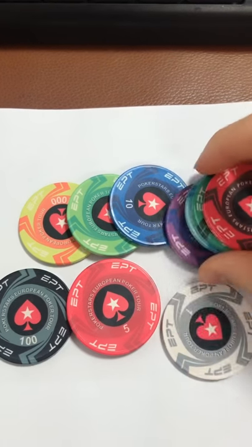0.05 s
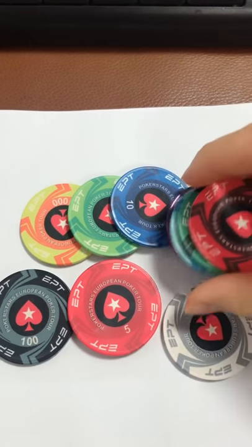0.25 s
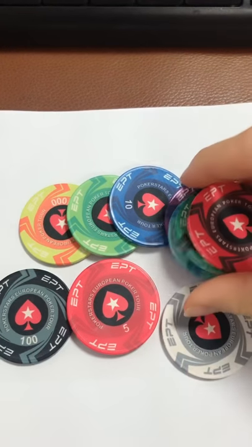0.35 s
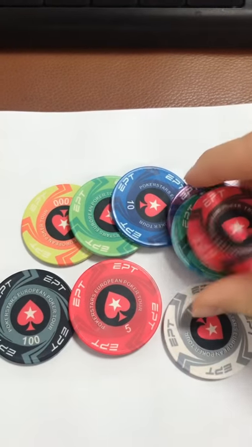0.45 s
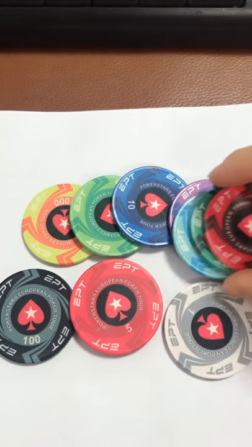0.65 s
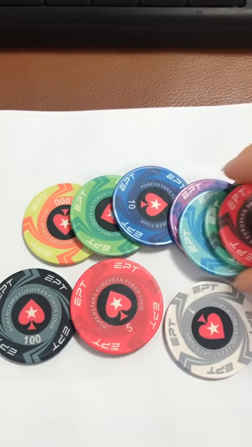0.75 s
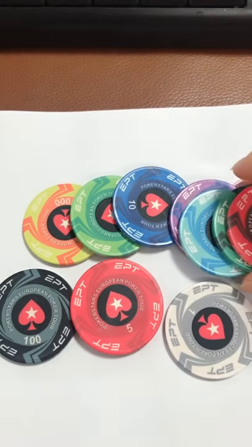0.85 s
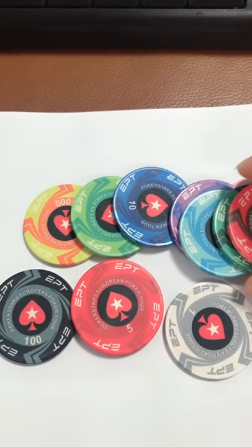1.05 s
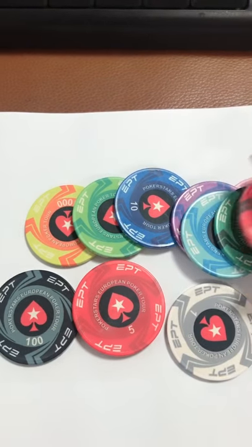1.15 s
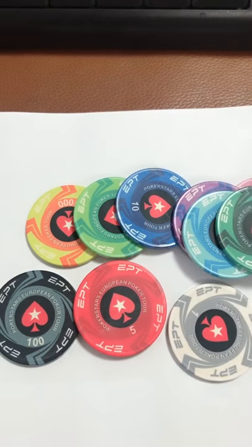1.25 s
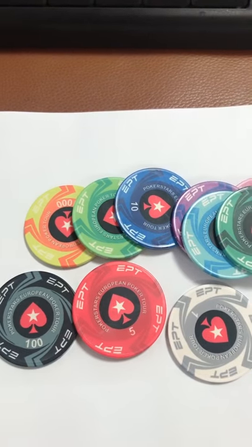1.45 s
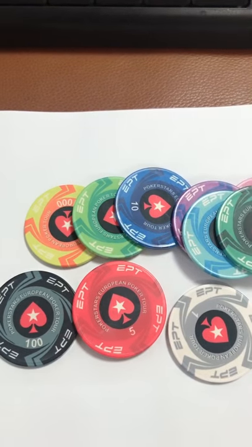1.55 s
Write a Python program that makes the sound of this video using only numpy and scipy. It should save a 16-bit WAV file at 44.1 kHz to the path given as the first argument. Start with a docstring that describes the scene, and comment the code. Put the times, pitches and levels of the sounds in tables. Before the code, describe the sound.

Plastic poker chips fall against each other close by, in a quick run of sharp, briefly ringing clacks from about 0.2 to 0.4 seconds, with soft table thuds underneath. A lighter click comes near 1 second, followed by faint hissing slides. At about 1.5 seconds a last chip tips onto paper with a double tap and thud. The small room rings briefly, over a faint hum and soft rumbles.

```python
"""In a small room, a hand lets plastic poker chips drop from a stack onto a paper-covered table close by.
They hit each other in a quick run of clacks, each a sharp crack and a short ring, then settle and slide
with a grainy hiss. Heavier blows make the table thud, and a last chip tips over and taps on the paper.
The room rings briefly after each clack and tap, over a low hum and soft rumbles."""
import sys
import numpy as np
from scipy import signal
from scipy.fft import rfft, irfft, next_fast_len
from scipy.io import wavfile
from scipy.ndimage import uniform_filter1d

SR = 44100
rng = np.random.default_rng(int(sys.argv[2]) if len(sys.argv) > 2 else 0)


def materialize(psi):
    """Save the field psi as 16-bit PCM at rate SR to the path in sys.argv[1].

    A 1-D psi becomes a single channel; in a 2-D psi each row is a channel.
    """
    bounded = np.clip(np.atleast_2d(psi).T, -1, 1)
    quanta = np.round(bounded * 32767).astype(np.int16)
    wavfile.write(sys.argv[1], SR, quanta)


N = 70560  # 1.6 s


def amp(db):
    """Turn decibels into a number to multiply by."""
    return 10 ** (np.asarray(db) / 20)


def unit(x):
    """Scale a sound so that its average power is 1."""
    return x / np.sqrt(np.mean(x ** 2) + 1e-20)


def fade(t, fade_s):
    """Die away from time zero; a fade time is how long it takes to drop 60 dB."""
    return amp(-60 * np.maximum(t, 0) / fade_s)


def along(points, hz):
    """Read between (frequency, value) points, spaced as the ear hears pitch."""
    f, values = np.transpose(points)
    return np.interp(np.log(hz + 1), np.log(f + 1), values)


def coloured(x, points):
    """Give a sound a tone colour: turn each frequency up or down as the points say."""
    m = next_fast_len(2 * len(x))
    gain = amp(along(points, np.fft.rfftfreq(m, 1 / SR)))
    cepstrum = irfft(np.log(gain), m)
    cepstrum[1:m // 2] *= 2  # fold the filter forward in time, so nothing sounds before the hit
    cepstrum[m // 2 + 1:] = 0
    return irfft(rfft(x, m) * np.exp(rfft(cepstrum)), m)[:len(x)]


def noise(points, size=N):
    """Steady noise with the given tone colour."""
    gain = amp(along(points, np.fft.rfftfreq(size, 1 / SR)))
    return unit(irfft(rfft(rng.standard_normal(size)) * gain, size))


def burst(shape):
    """A short puff of noise, evened out from bass to treble."""
    puff = shape * rng.standard_normal(len(shape))
    power = uniform_filter1d(np.abs(rfft(puff)) ** 2, size=20)
    hz = np.fft.rfftfreq(len(puff), 1 / SR)
    return coloured(puff, np.column_stack([hz, -10 * np.log10(power + 1e-12)]))


def add(out, start, x):
    """Mix x into out, beginning at start seconds."""
    i = max(round(start * SR), 0)
    out[i:i + len(x)] += x[:max(len(out) - i, 0)]


# Tone colour of the room's air: f/Hz, level/dB
AIR_COLOUR = [(15, -25), (28, -2), (42, 1), (62, -3.5), (80, -6.5), (120, -9.5), (160, -14.5), (260, -14.5),
              (400, -19), (650, -25.5), (1100, -26), (2000, -29), (3000, -35), (4200, -41.5), (6200, -42.5),
              (7800, -49), (11000, -51), (15500, -51.5)]
# The tones of the hum: f/Hz, level/dB
HUM_TONES = [(119, -61), (381, -63)]
def air_and_hum():
    """A soft rush of room air and a faint hum go on throughout."""
    t = np.arange(N) / SR
    air = amp(-50) * noise(AIR_COLOUR)
    hum = sum(amp(db) * np.sqrt(2) * np.sin(2 * np.pi * (hz * t + rng.random())) for hz, db in HUM_TONES)
    return air + hum


# Tone colour of rubbing plastic: f/Hz, level/dB
RUB_COLOUR = [(400, -35), (1200, 6), (2500, 8.5), (4000, -1.5), (6500, -4), (8000, -7), (9700, -5),
              (11000, -12), (12500, -5), (15500, -18.5)]
# Each slide: t/s, level/dB, rise/s, fade/s, squeak f/Hz, squeak level against the hiss/dB
CHIP_SLIDES = [(0, -57.5, 0.0025, 0.3, 6050, -3.5), (.565, -60.5, 0.007368, 0.25, 14860, -3),
               (1.041, -59.5, 0.0035, .2, 13600, -1.5), (1.136, -59, 0.0067, .2, 15250, -3),
               (1.172, -60.5, 0.00765, 0.1953, 2503, -3.5), (1.314, -63.5, .005, .25, 14000, -5),
               (1.424, -53, 0.013, 0.32, 15230, -11)]
def chip_slides():
    """Chips rub face to face: a grainy hiss and a thin squeak start quickly and run out."""
    out, t = np.zeros(N), np.arange(SR // 2) / SR
    n, hz = len(t), np.fft.rfftfreq(len(t), 1 / SR)
    squeak_width_hz, grain_db = 570, 2
    for start, db, rise, fade_s, squeak_hz, squeak_db in CHIP_SLIDES:
        band = 1 / (1 + ((hz - squeak_hz) / squeak_width_hz) ** 2)
        squeak = unit(irfft(rfft(rng.standard_normal(n)) * band, n))
        flicker = unit(uniform_filter1d(rng.standard_normal(n), size=60))
        grain = unit(amp(grain_db * flicker))
        rub = noise(RUB_COLOUR, size=n) + amp(squeak_db) * squeak
        shape = np.minimum(t / rise, 1) * fade(t - rise, fade_s)
        add(out, start, amp(db) * shape * grain * rub)
    return out


# The tones a chip rings with: f/Hz, level/dB, fade/s
CHIP_TONES = [(1220, -19.5, .014), (1787, -12, .014), (2900, -11.5, .012), (3718, -9.5, .018),
              (4407, -11, .014), (5934, -3, .018), (6560, -2, 0.022), (9100, -15, 0.011), (9900, -19, .012),
              (12030, -2, 0.0055), (14170, -12.5, 0.027), (15200, -7, 0.0083)]
def chip_ring(t, stretch):
    """A struck chip shakes at several pitches at once, a little differently on every hit."""
    hz, db, fade_s = np.transpose(CHIP_TONES)[:, :, None]
    detune, vary = rng.standard_normal((2, len(CHIP_TONES), 1))
    signs = (-1) ** np.arange(len(CHIP_TONES))[:, None]  # every other tone starts downward
    waves = signs * np.sin(2 * np.pi * hz * (1 + .014 * detune) * t)
    tones = amp(db + .34 * vary) * fade(t, fade_s * stretch) * waves
    return .5 * tones.sum(0) * (1 - np.exp(-t / .0002))


# Tone colour of rattling rims: f/Hz, level/dB
RIM_COLOUR = [(300, -16), (900, -16), (1700, -4), (2500, -7.5), (3600, -6), (5100, -7.5), (6400, 2.5),
              (7300, -12), (8000, -16.5), (9200, -5.5), (10600, -12), (12200, -3), (13600, -10),
              (15000, -5)]
# Each hit: t/s, level/dB, then how much is added to four bands from low to high
# (clunk/dB, hollow body/dB, lower ring/dB, snap/dB), and a stretch factor for the fade times
CHIP_HITS = [(.2338, -0.5, -13, -3.5, -8, -6.5, 0.94), (0.2373, -14, -13, 0, -1, -6, 1.6),
             (.2420, -14, -0.5, 3.5, -3, 1, 1.24), (0.2461, -20.5, -1, 3.5, 9, 6, 1.5),
             (.2538, -18, -1.5, -4, -3, -13, .8), (.2553, -5, -9, 0, 0, 0.995, .6),
             (.2567, -4, -6.5, -6, 2, 6, 0.29), (0.258, -3.5, -10.5, -27, -6, -13, 0.99),
             (0.2606, -18.5, -4, -1, 2, -7.5, 0.79), (0.275, -8.5, -7.5, -4, -2, 7, .6),
             (0.2783, -10, -8, -1.5, -1.5, -12.5, 1.2), (0.2822, -12, 0, -1.5, -2.5, -7.5, 1.1),
             (0.2924, -22.5, -1, 1.5, 0.5, -3.5, 1.3), (0.31, -29, 7.5, -3.5, 0, 0.5, 1.4),
             (.3220, -30, -8, -22, 6.5, -19, 1), (0.3348, -21.5, 5.5, 5.5, 13, 15, 0.35),
             (.3645, -35, 6, 10, -3, -8.5, 1.1), (.3670, -29, 14.5, 11.5, 0, -2, 1.55),
             (0.369, -20, 7.5, -1, 9, 1, 1.04), (.4040, -37.5, 11.5, 11.5, 12, 0, 1.1),
             (.4067, -29.5, 9.5, 0.5, 2, -6, 1.3), (0.4318, -31.5, 17.5, 8, 2.5, -9, 0.55),
             (.9510, -24, 8.5, 7.5, -6, 1.5, .55), (0.9637, -45, 15, -1, -6, -7.5, 1.2),
             (0.968, -32.5, 8.5, -3, 1, -10.5, 1.08)]
def chip_clacks():
    """Chip hits chip with a crack, rattle and ring; where it lands sets the tone and how fast it fades."""
    out, t = np.zeros(N), np.arange(SR // 20) / SR
    for start, db, clunk, body, lower_ring, snap, stretch in CHIP_HITS:
        ring = chip_ring(t, stretch)
        crack_shape = fade(t, .008 * stretch)
        rattle_shape = amp(-8.5) * fade(t, .03 * stretch)
        rims = amp(15.5) * np.sqrt(stretch) * coloured(burst(crack_shape + rattle_shape), RIM_COLOUR)
        colour = [(400, 0), (1200, clunk), (2300, clunk), (3400, body), (4600, body),
                  (5400, lower_ring), (6000, lower_ring), (6400, 0), (7000, 0),
                  (7950, -6), (8800, snap / 2), (11000, snap)]  # the sound dips narrowly near 8 kHz
        add(out, start, amp(db) * in_room(coloured(ring + rims, colour)))
    return out


# How long the room rings: f/Hz, fade/s
ROOM_FADES = [(300, .45), (2000, 0.37), (4000, 0.33), (6300, .4), (9000, .33), (15000, 0.19)]
def in_room(x):
    """The room follows a sound with a short wash of echoes; the highest treble dies first."""
    hz, t = np.fft.rfftfreq(256, 1 / SR)[:, None], np.arange(128) * 128 / SR
    phases = np.exp(2j * np.pi * rng.random((len(hz), len(t))))
    tail = signal.istft(phases * fade(t, along(ROOM_FADES, hz)), SR)[1]
    tail *= 1 - fade(np.arange(len(tail)) / SR, .012)  # echoes take a moment to build
    echoes = amp(-14.5) * tail / np.linalg.norm(tail)
    echoes[0] = 1  # the direct sound
    return signal.fftconvolve(x, echoes)


# Tone colour of the table top: f/Hz, level/dB
THUD_COLOUR = [(60, -26), (200, -11.5), (350, 3), (520, -4.5), (800, -5), (1300, -22.5), (2600, -21.5),
               (6000, -42)]
# Blows that reach the table: t/s, thud level/dB, thud rise/s, boom level/dB
TABLE_BLOWS = [(.236, -50, 0.0074, -60), (.255, -45.5, 0.0028, -54.5), (0.277, -43.5, 0.0032, -54),
               (.369, -44.5, 0.0034, -51.5), (1.529, -42.5, 0.0011, -63), (1.549, -34.5, 0.00085, -52),
               (1.559, -40.5, 0.00089, -59.5)]
def table_knocks():
    """The table answers heavier blows with a dull thud and a faint boom, its lowest tone."""
    out, t = np.zeros(N), np.arange(SR // 2) / SR
    boom_hz = 192
    boom_shape = fade(t, fade_s=.9) * (1 - np.exp(-t / .04))
    for start, thud_db, rise, boom_db in TABLE_BLOWS:
        shape = fade(t, fade_s=.11) * (1 - np.exp(-t / rise))
        thud = unit(noise(THUD_COLOUR, size=len(t)) * shape) * np.sqrt(np.mean(shape ** 2))
        boom = np.sin(2 * np.pi * (boom_hz * t + rng.random())) * boom_shape
        add(out, start, amp(thud_db) * thud + amp(boom_db) * boom)
    return out


# Each low swell: peak t/s, level/dB, half length/s
LOW_SWELLS = [(.34, -44.5, 0.055), (0.468, -40, 0.018), (1.036, -42.5, 0.0069), (1.233, -35.5, 0.027),
              (1.363, -44, 0.021), (1.426, -40.5, 0.02)]
def soft_rumbles():
    """Deep swells, only a few waves long, come and go while the hand moves."""
    out, t = np.zeros(N), np.arange(N) / SR
    for peak, db, half_length in LOW_SWELLS:
        hz = 39.943 * (1 + .0995 * rng.standard_normal())
        swell = np.exp(-.5 * ((t - peak) / half_length) ** 2)
        out += amp(db) * np.sqrt(2) * swell * np.sin(2 * np.pi * (hz * (t - peak) + rng.random()))
    return out


# Tone colour of a chip landing on paper: f/Hz, level/dB
TAP_COLOUR = [(300, -10), (800, -1.5), (1700, -2), (2400, 5), (3200, -9), (3800, 0.5), (5000, -4),
              (6000, -8), (7200, -14.5), (9000, -18), (12500, -23), (15500, -23)]
# Each tap of the last chip: t/s, level/dB, fade/s
PAPER_TAPS = [(1.5296, -15, 0.0089), (1.5478, -4, 0.023)]
def paper_taps():
    """The last chip tips over; the paper muffles it, so it taps without ringing."""
    out, t = np.zeros(N), np.arange(SR // 10) / SR
    for start, db, fade_s in PAPER_TAPS:
        tap = coloured(burst(fade(t, fade_s)), TAP_COLOUR)
        add(out, start, amp(db) * in_room(tap))
    return out


def scene():
    """Room, chips and table together in one channel."""
    mix = air_and_hum() + chip_slides() + chip_clacks() + table_knocks() + soft_rumbles() + paper_taps()
    return mix[None]


def record(dry):
    """Cut off the very highest treble."""
    top_hz, edge_hz = 15850, 300
    m = next_fast_len(N + SR // 2)
    keep = np.clip((top_hz - np.fft.rfftfreq(m, 1 / SR)) / edge_hz + .5, 0, 1)
    return irfft(rfft(dry, m) * keep, m)[:, :N]


dry = scene()
out = record(dry)
materialize(out)
```